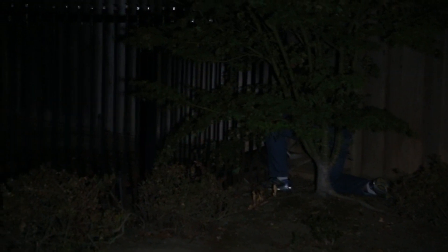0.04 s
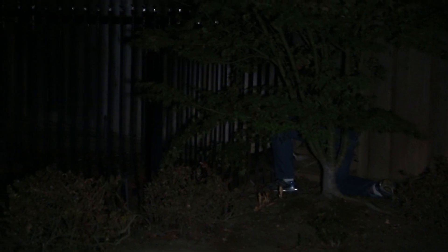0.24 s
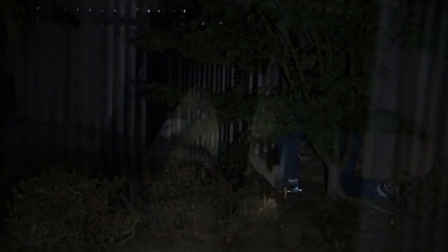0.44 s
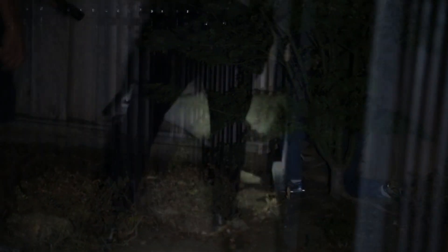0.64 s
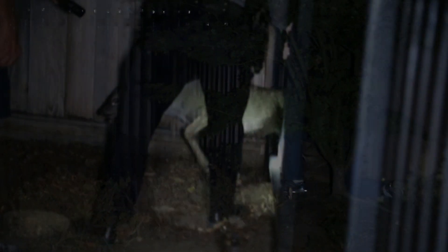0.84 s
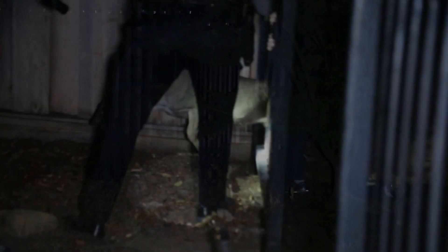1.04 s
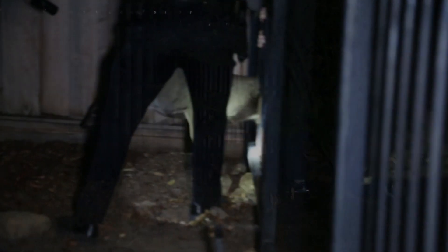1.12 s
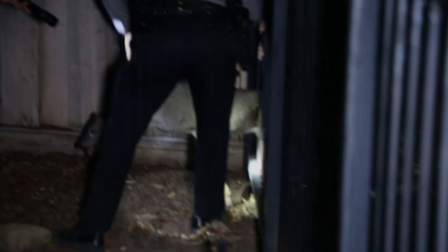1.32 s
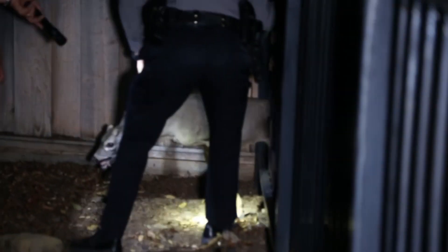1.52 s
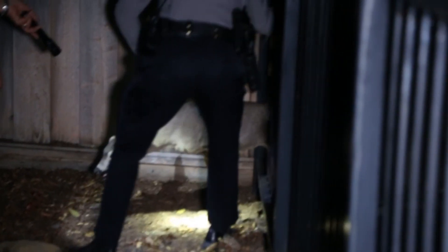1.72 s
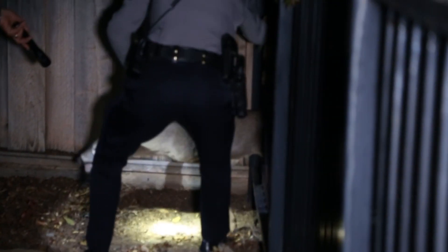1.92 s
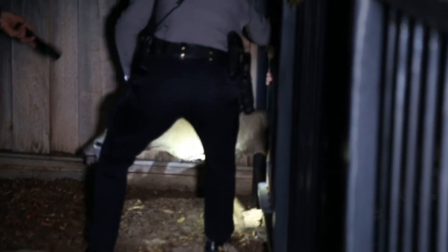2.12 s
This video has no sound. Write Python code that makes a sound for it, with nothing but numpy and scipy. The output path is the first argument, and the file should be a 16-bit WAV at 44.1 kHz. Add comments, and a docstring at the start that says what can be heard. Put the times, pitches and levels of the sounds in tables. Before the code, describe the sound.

A deer's long distress bleat dominates. First comes faint, bassy outdoor night hush, with a soft dull bump at 0.4 s. From about 0.5 s the cry fades in low, breaks upward near 0.63 s, rises to a peak around 1.45 s, then sinks until about 2.2 s. It is nasal, raspy and clipped, cracking near 1.35 and 2.08 s, with tiny snaps around 0.7-0.8 and 1.8 s.

```python
"""A trapped deer gives one long distress bleat in a garden at night, close to the microphone.
The voice is a stack of overtones: it starts low, breaks upward, arches in pitch and cracks a few times.
Single overtones fade against their echo, air rasps along, and tiny snaps are heard on top.
The cry overloads the microphone, which flattens its peaks.
It fades in over a quiet outdoor background of coloured noise with one soft bump."""
import sys
import numpy as np
from scipy import signal
from scipy.fft import rfft, irfft, next_fast_len
from scipy.io import wavfile

SR = 44100
rng = np.random.default_rng(int(sys.argv[2]) if len(sys.argv) > 2 else 0)


def digitize_waveform(pressure):
    """Quantize a signal to 16-bit integers and store it at the path in sys.argv[1].

    Rows of a 2-D input are taken as channels; values are limited to [-1, 1].
    """
    field = np.atleast_2d(pressure).T
    bounded = np.clip(field, -1, 1)
    quanta = np.round(bounded * 32767).astype(np.int16)
    wavfile.write(sys.argv[1], SR, quanta)


N = 95741
TIME = np.arange(N) / SR   # seconds

# Levels of the voice, rasp and snaps are in dB relative to the height where the microphone overloads.
# pitch of the low opening: t/s, f/Hz
OPENING_PITCH = [(.47, 216.2), (.505, 221.2), (.53, 229.6), (.56, 227), (.58, 241.2), (.605, 248.7),
                 (.624, 247.7)]
# pitch of the full cry after the break, in two stretches: t/s, f/Hz
CRY_PITCH = [
    [(0.637, 274.8), (0.696, 281.7), (0.792, 287.4), (0.814, 284.1), (0.906, 298), (0.954, 296),
     (0.976, 291.1), (1.062, 290), (1.168, 300.2), (1.244, 300.8), (1.34, 308.2)],
    [(1.37, 310.5), (1.434, 315.3), (1.536, 313.5), (1.702, 302.6), (1.836, 299.8), (2.066, 285.9),
     (2.17, 272.2)],
]
# strength of the throat's main resonance: t/s, level/dB
MAIN_LEVEL = [(.47, 7), (.5, 0.5), (.61, -3), (.645, 5), (.76, 2.5), (.788, -4), (.805, 9), (.84, 0.5),
              (.88, 4), (.935, 4), (.975, -0.5), (1.025, -5), (1.07, -0.5), (1.16, 3), (1.3, 5), (1.34, 4),
              (1.4, 5), (1.59, 9), (1.68, 2), (1.74, 4), (1.84, 3.5), (1.96, 1), (2.02, -4), (2.06, -0.5),
              (2.08, -2.5), (2.12, 3), (2.17, 2.5)]
MAIN_HZ, MAIN_WIDTH_HZ = 893, 145
# a weaker resonance above the main one: t/s, centre f/Hz, level/dB
SHOULDER_RESONANCE = [(.5, 1270, -11), (.61, 1265, -9.5), (.68, 1205, -14), (.82, 1255, -6),
                      (.91, 1350, -16), (.955, 1360, -2.5), (1.0, 1275, -1), (1.09, 1120, -9.5),
                      (1.17, 1300, -27), (1.31, 1282, -3), (1.36, 1417, 1), (1.42, 1330, -41),
                      (1.56, 1267, -24), (1.72, 1175, -11), (1.84, 1167, -16), (1.96, 1312, -1.5),
                      (2.015, 1440, -16.5), (2.05, 1241, -4.5), (2.17, 1215, -0.5)]
SHOULDER_WIDTH_HZ = 141.4
# upper resonance: t/s, centre f/Hz, level/dB
UPPER_RESONANCE = [(.52, 1950, -7), (.66, 1990, -8), (.705, 1940, -16.5), (.735, 1925, -8.5),
                   (.815, 1980, -3.5), (.9, 2000, -16), (.955, 2114, 0), (.985, 2140, -13),
                   (1.025, 2066, 1), (1.1, 2052, -1.5), (1.17, 2002, -7), (1.24, 2028, -2),
                   (1.295, 2160, -15.5), (1.335, 1997, -0.5), (1.385, 2070, -1.5), (1.42, 2080, -10.5),
                   (1.53, 2060, -13), (1.6, 1875, -2), (1.65, 1875, -5), (1.7, 1972, -8),
                   (1.76, 2030, -4.5), (1.9, 1950, -3), (2.0, 1930, -3.5), (2.04, 1953, -5),
                   (2.08, 2002, 4), (2.17, 1890, -11.5)]
UPPER_WIDTH_HZ = 237
# third, highest resonance: t/s, centre f/Hz, level/dB
THIRD_RESONANCE = [(.55, 2820, -23), (.6, 2860, -12), (.66, 2670, -20), (.85, 2610, -16), (.885, 2780, -13),
                   (.93, 2630, -43), (1.01, 2620, -11), (1.12, 2623, -27), (1.25, 3006, -24),
                   (1.32, 3050, -9), (1.38, 2730, -7.5), (1.53, 2857, -16.5), (1.65, 2820, -29),
                   (1.75, 3190, -17), (1.93, 3060, -15), (2.0, 2750, -38), (2.04, 2580, -6),
                   (2.068, 2550, -4.5), (2.082, 2550, -48)]
THIRD_WIDTH_HZ = 220
# strength of the low band: t/s, level/dB
LOW_LEVEL = [(.5, -19), (.56, -15), (.61, -4.5), (.65, -12.5), (1.07, -33.5), (1.12, -16), (1.201, -12),
             (1.311, -14.5), (1.361, -21.5), (1.45, -11), (1.632, -15.5), (1.8, -7.5), (1.952, -9.5),
             (2.1, -10.5), (2.17, -30)]
LOW_HZ, LOW_WIDTH_HZ = 683, 128
LAG_WIDTH_HZ = 142   # half width that sets the lag of the main, shoulder, upper and third resonances
# overtones apart from the resonances, before effort is added: f/Hz, level/dB
THROAT_COLOUR = [(280, -36.5), (600, -48), (900, -12), (1200, -58), (1500, -43), (1900, -18), (2400, -13.5),
                 (2750, -16.5), (3200, -19), (4000, -26.5), (5500, -25.5), (8000, -37.5), (14000, -47.5)]
# effort of the voice, added to the throat colour: t/s, level/dB
EFFORT = [(.5, -24), (.61, -15.5), (.72, -2.5), (0.819, -7), (0.901, -6), (.99, -3), (1.1, -7.5),
          (1.2, -4.5), (1.355, -2.5), (1.43, -6.5), (1.562, 2), (1.629, -4), (1.722, -1), (1.84, -1.5),
          (1.92, -1), (2.02, -2.5), (2.08, -6.5), (2.17, -3.5)]
# moments when the voice cracks: t/s, half length/s, roughness (0 to 1)
CRACKS = [(0.561, 0.023, 0.24), (0.628, 0.016, 0.53), (1.354, 0.007, 0.18), (1.65, 0.022, 0.02),
          (2.077, 0.0076, 0.46)]
CLEAR_ROUGHNESS = 0.1   # flutter that is always there
# pitch jitter as a share of the pitch, its extra share per unit of roughness, and its speed
JITTER, ROUGH_JITTER, JITTER_HZ = 0.00148, 0.013, 31.6
FLUTTER, FLUTTER_HZ = 1, 21.6   # flutter of each overtone per unit of roughness, and its speed
# slow wander of the tenth overtone; higher ones wander faster and further
WANDER_DB, WANDER_RADIANS, WANDER_HZ = 2.5, 1, 4.82
# where an overtone cancels against its echo: t/s, f/Hz, half length/s, share left (sign: way the phase turns)
ECHO_NULLS = [(0.627, 740, 0.0037, 0.33), (0.821, 860, 0.026, 0.12), (1.1, 880, 0.031, 0.13),
              (1.353, 925, 0.018, -0.064), (1.649, 910, 0.066, 0.1), (1.877, 2400, 0.045, -0.04),
              (2.056, 2000, 0.025, 0.039)]
# colour of the air rasping in the throat: f/Hz, level/dB (per Hz)
RASP_COLOUR = [(40, 6), (200, 7), (450, 4.5), (850, -33), (1500, 1), (2200, 2.5), (3000, 1), (4500, -2.5),
               (8000, -8), (15000, -21)]
# strength of that rasp: t/s, level/dB
RASP_LEVEL = [(.5, -24), (.61, -27), (.7, -25), (.8, -32), (.9, -26), (.98, -27), (1.07, -38), (1.21, -26),
              (1.282, -38), (1.5, -37), (1.72, -33), (1.84, -48), (2.0, -37), (2.1, -31), (2.17, -33)]
CRACK_RASP_DB = -21   # extra rasp per unit of crack roughness
# tiny snaps: t/s, level/dB
SNAPS = [(.711, -20), (.785, -15), (1.772, -20), (1.845, -12)]
# colour of the snaps: f/Hz, level/dB (per Hz)
SNAP_COLOUR = [(1000, -30), (5000, -6), (8000, 0)]
SNAP_DECAY_S = 0.0016
KNEE_SHARPNESS, TREBLE_HZ = 90, 13600   # how abruptly peaks flatten; where the treble softens
# colour of the bump: f/Hz, level/dB (per Hz)
BUMP_COLOUR = [(60, -22), (210, 6), (300, -6), (450, 4), (700, -12), (1200, -48), (5000, -65)]
BUMP_S, BUMP_ATTACK_S, BUMP_DECAY_S, BUMP_DB = .396, 0.0035, 0.009, -23.5
# colour of the outdoor background: f/Hz, level/dB (per Hz)
NIGHT_COLOUR = [(25, -27), (40, 1), (70, 6), (140, -1), (220, -4), (380, -12.5), (600, -12), (1100, -19),
                (1600, -24), (2150, -22), (2900, -30), (6000, -36), (15000, -38.5)]
NIGHT_DB, NIGHT_NEAR_DB = -40, -34.5   # alone; and going into the overloaded microphone
FADE_START_S, FADE_LENGTH_S, CRY_DB = 0.47, 0.98, -3
CUTOFF_HZ = 15800


def from_db(db):
    """Turn decibels into a gain."""
    return 10 ** (np.asarray(db) / 20)


def rms_one(x):
    """Scale to unit power."""
    return x / np.sqrt(np.mean(x ** 2) + 1e-20)


def in_time(rows):
    """Join a table's points with straight lines: each column at every sample."""
    s, *columns = np.transpose(rows)
    return [np.interp(TIME, s, column) for column in columns]


def level_in_time(rows):
    """A table of decibels over time, as a gain at every sample."""
    return from_db(in_time(rows)[0])


def at_hz(points, hz):
    """Read a colour table on a log-frequency axis."""
    table_hz, table_db = np.transpose(points)
    return np.interp(np.log(hz), np.log(table_hz), table_db)


def drift(rate_hz):
    """Smooth random motion of spread 1: white noise smoothed twice; a higher rate moves faster."""
    step = 20   # made at one twentieth of the sample rate
    r = np.exp(-2 * np.pi * rate_hz * step / SR)
    white = rng.standard_normal(N // step + 2002)
    slow = signal.lfilter([1], [1, -2 * r, r * r], white)[2000:]   # drop the filter's start
    return np.interp(np.arange(N) / step, np.arange(len(slow)), rms_one(slow))


def noise(colour):
    """Noise of a given colour at unit power: white noise with each frequency rescaled."""
    size = next_fast_len(N)
    hz = np.maximum(np.fft.rfftfreq(size, 1 / SR), 1)
    spectrum = rfft(rng.standard_normal(size)) * from_db(at_hz(colour, hz))
    return rms_one(irfft(spectrum, size)[:N])


def band(hz, centre_hz, width_hz, order):
    """Gain of a resonance; a higher order has a flatter top and steeper sides."""
    return np.exp(-np.abs((hz - centre_hz) / width_hz) ** order)


def bleat():
    """Overtones of one pitch, shaped and delayed by resonances; cracks add flutter and rasp."""
    cracks = sum(rough * np.exp(-((TIME - s) / half) ** 2) for s, half, rough in CRACKS)
    pitch, = in_time(np.vstack([OPENING_PITCH, *CRY_PITCH]))
    jitter = (JITTER + ROUGH_JITTER * cracks) * drift(JITTER_HZ)
    phase = 2 * np.pi * np.cumsum(pitch * (1 + jitter)) / SR
    main, low, effort = [level_in_time(rows) for rows in (MAIN_LEVEL, LOW_LEVEL, EFFORT)]
    shoulder_hz, shoulder_db = in_time(SHOULDER_RESONANCE)
    upper_hz, upper_db = in_time(UPPER_RESONANCE)
    third_hz, third_db = in_time(THIRD_RESONANCE)
    shoulder, upper, third = from_db(shoulder_db), from_db(upper_db), from_db(third_db)
    flutter = FLUTTER * (CLEAR_ROUGHNESS + cracks)
    voice = np.zeros(N)
    for k in range(1, 46):
        hz, height = k * pitch, k / 10
        wander_hz = WANDER_HZ * np.sqrt(height)
        wander_db = WANDER_DB * np.sqrt(height) * drift(wander_hz)
        gain = effort * from_db(at_hz(THROAT_COLOUR, hz) + wander_db)
        if k < 13:   # only the lower overtones pass through the resonances
            resonances = (main * band(hz, MAIN_HZ, MAIN_WIDTH_HZ, order=6)
                          + shoulder * band(hz, shoulder_hz, SHOULDER_WIDTH_HZ, order=2)
                          + low * band(hz, LOW_HZ, LOW_WIDTH_HZ, order=6)
                          + upper * band(hz, upper_hz, UPPER_WIDTH_HZ, order=2)
                          + third * band(hz, third_hz, THIRD_WIDTH_HZ, order=6))
            gain = np.hypot(gain, resonances)
            lag_centres = (MAIN_HZ, shoulder_hz, upper_hz, third_hz)
            lag = sum(np.arctan2(LAG_WIDTH_HZ, centre - hz) for centre in lag_centres)
        else:
            lag = rng.uniform(0, 2 * np.pi)
        fade = echo_fade(k, pitch)
        wander = WANDER_RADIANS * height * drift(wander_hz)
        angle = k * phase - lag + np.angle(fade) + wander
        # two independent flutters shake both the strength and the phase
        in_step = (1 + flutter * drift(FLUTTER_HZ)) * np.sin(angle)
        out_of_step = flutter * drift(FLUTTER_HZ) * np.cos(angle)
        voice += gain * np.abs(fade) * (in_step + out_of_step)
    return voice + rasp(phase, cracks)


def echo_fade(overtone, pitch):
    """An overtone cancelling against its echo dips sharply and comes back with the opposite sign."""
    fade = np.ones(N, complex)
    for s, hz, half, left in ECHO_NULLS:
        nearest_overtone = round(hz / np.interp(s, TIME, pitch))
        if nearest_overtone == overtone:
            away = (TIME - s) / half
            fade = fade * (away - 1j * left) / np.hypot(1, away)
    return fade


def rasp(phase, cracks):
    """Air noise in the throat, puffing once per pitch cycle and swelling at each crack."""
    puffs = 1 + np.cos(phase)
    strength = level_in_time(RASP_LEVEL) + from_db(CRACK_RASP_DB) * cracks
    return noise(RASP_COLOUR) * puffs * strength


def snaps():
    """Tiny bright snaps, as of dry leaves underfoot: noise that starts abruptly and dies away."""
    strength = sum(from_db(db) * (TIME >= s) * np.exp(-np.abs(TIME - s) / SNAP_DECAY_S) for s, db in SNAPS)
    return noise(SNAP_COLOUR) * strength


def overload(x):
    """The microphone flattens every peak at 1 and softens the top treble."""
    fine = signal.resample_poly(x, 2, 1)   # bend the wave at twice the sample rate
    flat = fine / (1 + np.abs(fine) ** KNEE_SHARPNESS) ** (1 / KNEE_SHARPNESS)
    pole = np.exp(-2 * np.pi * TREBLE_HZ / SR)
    return signal.lfilter([1 - pole], [1, -pole], signal.resample_poly(flat, 1, 2))


def bump():
    """A dull knock: a burst of noise that rises quickly and dies at once."""
    age = np.maximum(TIME - BUMP_S, 0)
    shape = np.minimum(age / BUMP_ATTACK_S, 1) * np.exp(-age / BUMP_DECAY_S)
    return from_db(BUMP_DB) * noise(BUMP_COLOUR) * shape


def night(level_db):
    """The quiet outdoor background: steady noise, strongest in the bass."""
    return from_db(level_db) * noise(NIGHT_COLOUR)


def scene():
    """The quiet night cross-fades, at equal power, into the overloaded cry."""
    cry = from_db(CRY_DB) * overload(bleat() + snaps() + night(NIGHT_NEAR_DB))
    quiet = night(NIGHT_DB) + bump()
    turn = np.pi / 2 * np.clip((TIME - FADE_START_S) / FADE_LENGTH_S, 0, 1)
    return (np.sin(turn) * cry + np.cos(turn) * quiet)[None]


def record(dry):
    """The top of the treble is cut steeply."""
    low_pass = signal.ellip(10, .05, 60, CUTOFF_HZ, fs=SR, output="sos")
    return signal.sosfiltfilt(low_pass, dry)


dry = scene()
out = record(dry)
digitize_waveform(out)
```